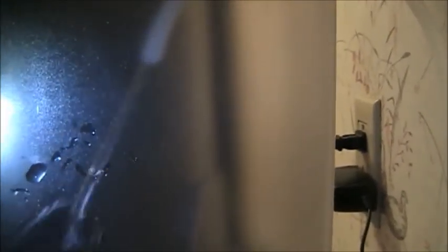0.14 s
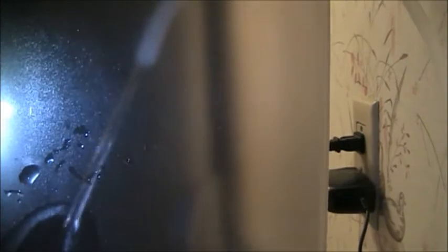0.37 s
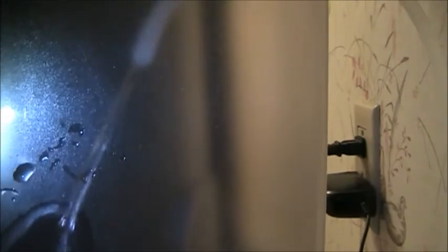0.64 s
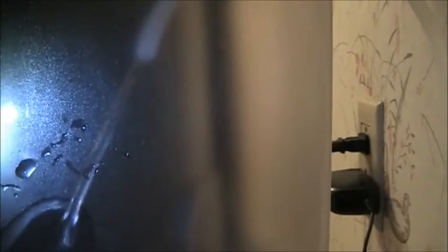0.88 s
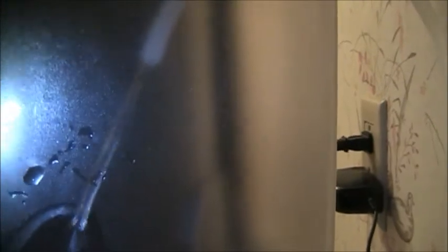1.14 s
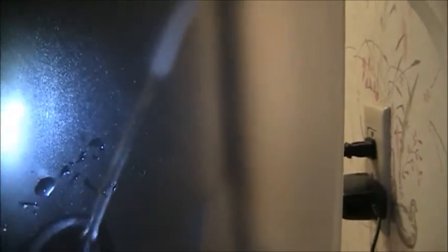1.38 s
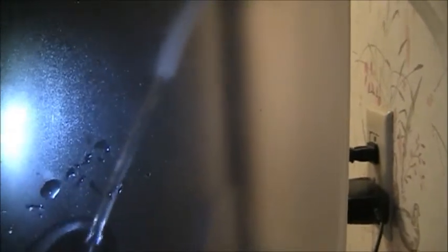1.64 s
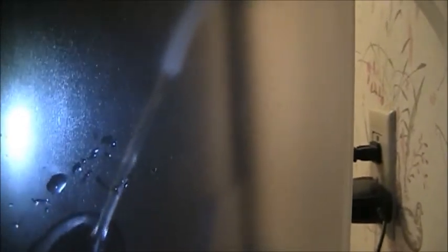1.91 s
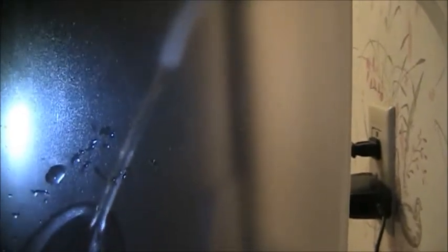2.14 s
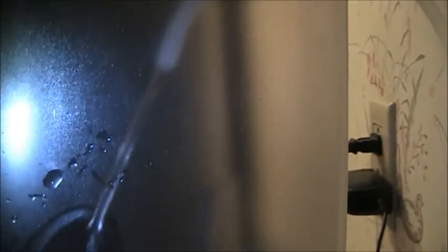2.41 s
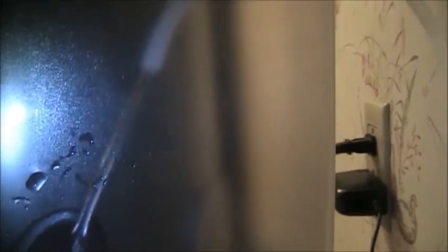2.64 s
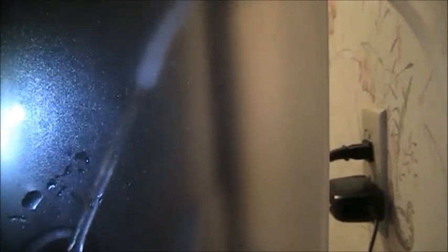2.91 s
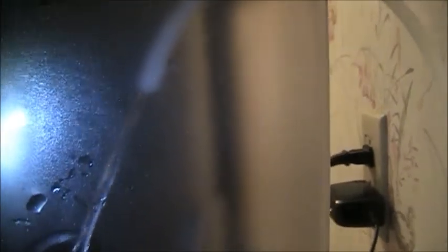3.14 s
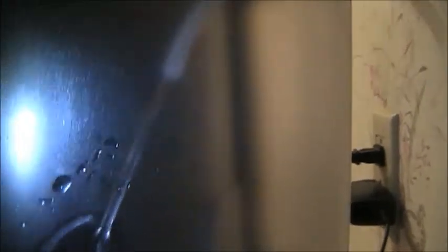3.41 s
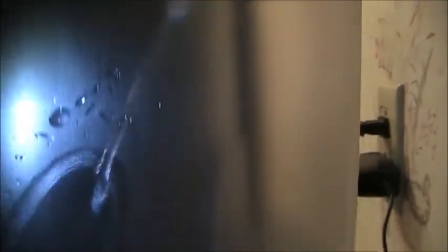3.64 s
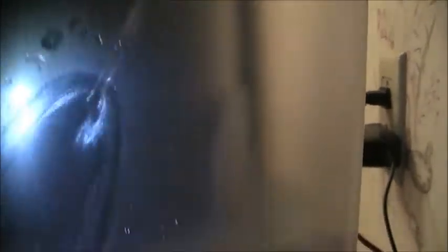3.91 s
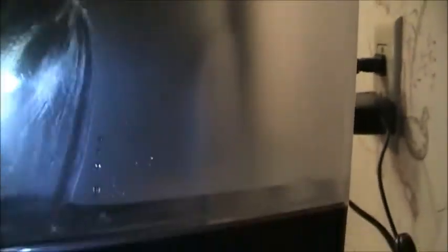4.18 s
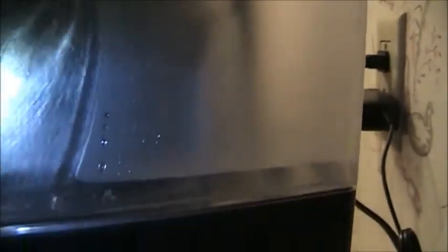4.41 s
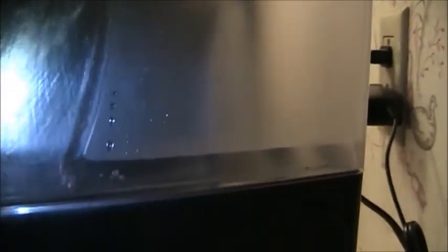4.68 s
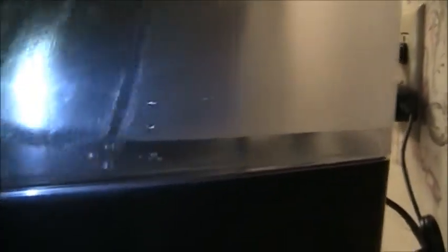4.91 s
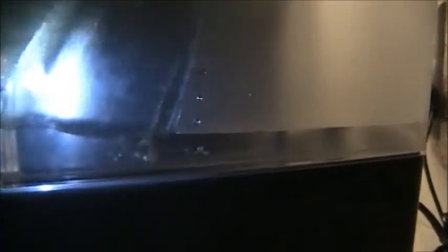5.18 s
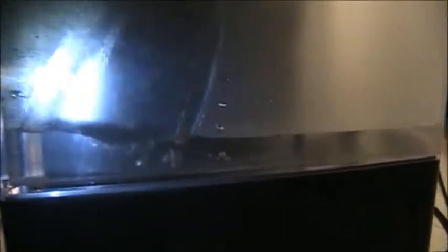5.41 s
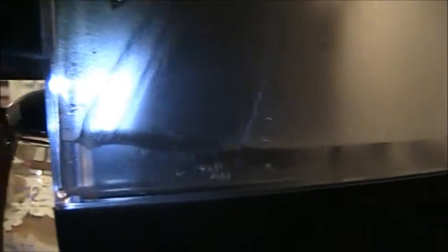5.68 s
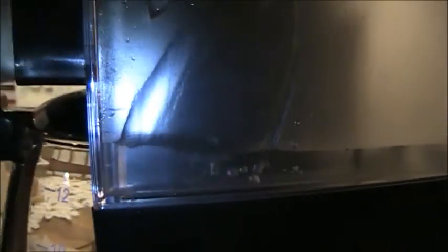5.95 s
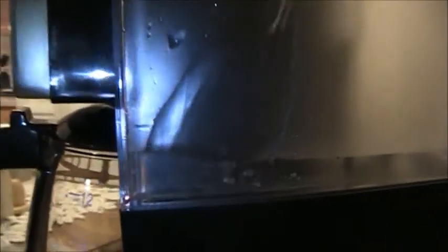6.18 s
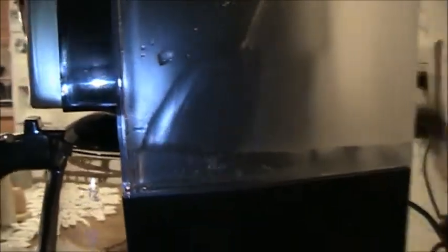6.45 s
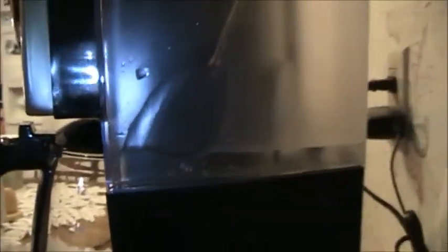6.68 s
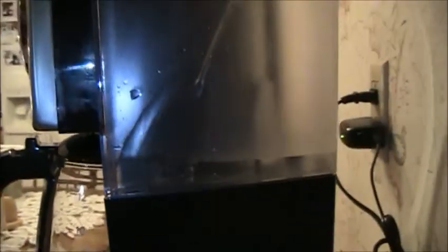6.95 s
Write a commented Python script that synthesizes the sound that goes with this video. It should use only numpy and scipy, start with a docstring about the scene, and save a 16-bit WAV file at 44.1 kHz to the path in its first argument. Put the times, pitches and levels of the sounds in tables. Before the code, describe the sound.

A sharp double clack of an electric valve opening, then a low mains hum, hollow water rush and bright bubble ticks in a plastic reservoir.

```python
"""A quiet kitchen: an electric valve clacks open and its coil hums at mains multiples, sums of decaying
and steady sines. Water rushes through the line, shaped noise that makes the plastic reservoir drone;
where the jet lands, small bubbles pop with bright ticks, short rings on splash clicks. A hand-held camera
with two close microphone ports rises above the reservoir, drifts down to its side, then lifts a little."""
import sys
import numpy as np
from scipy import signal
from scipy.fft import rfft, irfft, next_fast_len
from scipy.io import wavfile
from scipy.ndimage import uniform_filter1d

SR = 44100
rng = np.random.default_rng(int(sys.argv[2]) if len(sys.argv) > 2 else 0)


def makeup_ratio(level_db):
    """Linear amplitude ratio for a level in decibels (20 dB per factor of ten)."""
    decades = np.asarray(level_db, float) / 20
    return 10 ** decades


def to_wav(sig):
    """Store sig (one row per channel, or 1-D mono) as 16-bit WAV at the path in sys.argv[1].

    Samples outside -1..1 are clipped; the rate is SR.
    """
    pcm = np.clip(np.atleast_2d(sig), -1, 1) * 32767
    pcm = np.round(pcm).astype(np.int16)
    wavfile.write(sys.argv[1], SR, pcm.T)  # frames by channels


N = 311787

# Water flow and camera. Each row: time in seconds, rush level in dB, camera height (1 above, 0 beside).
FLOW = [(.12, -44, .7), (1.5, -42.5, .9), (2.3, -42, 1), (3.4, -41, .95), (4, -40, .45), (4.6, -40, .1),
        (5.7, -40, 0), (6.3, -41, 0), (7.07, -44, .3)]


def evened(x):
    """Scales to unit rms."""
    return x / np.sqrt(np.mean(x ** 2) + 1e-20)


def read(points, hz):
    """Reads a spectrum on a log-frequency axis."""
    f, value = np.transpose(points)
    return np.interp(np.log(hz + 1), np.log(f + 1), value)


def curve(rows, t):
    """Columns of a table at the times t."""
    s, *columns = np.transpose(rows)
    return [np.interp(t, s, c) for c in columns]


def add(mix, s, sound):
    """Lays a sound into the mix, channel by channel, at s seconds."""
    part = mix[:, round(s * SR):][:, :sound.shape[1]]
    part += sound[:, :part.shape[1]]


def hill(hz, centre_hz, width_hz):
    """Resonance shape: 1 at the centre, 1/2 half a width away."""
    return 1 / (1 + (2 * (hz - centre_hz) / width_hz) ** 2)


def noise(size, likeness, magnitude):
    """Two partly alike channels of random short-time spectra, shaped by magnitude(hz, t), at unit rms."""
    hop = size // 4
    frames = N // hop + 5
    hz = np.fft.rfftfreq(size, 1 / SR)[:, None]
    a, b, c, d = rng.standard_normal((frames, len(hz), 4)).T
    same = likeness(hz)
    left = a + 1j * b
    right = same * left + np.sqrt(1 - abs(same) ** 2) * (c + 1j * d)
    z = np.array([left, right]) * magnitude(hz, np.arange(frames) * hop / SR)
    return evened(signal.istft(z, nperseg=size, noverlap=size - hop)[1][:, :N])


def kitchen(level_db=-47.5):
    """Steady background of the room and the camera: shaped noise."""
    # Kitchen at rest. Each row: frequency in Hz, relative density in dB per Hz.
    room_spectrum = [(18, -34), (38, -28), (50, -9), (60, -7), (70, -16), (135, -19), (170, -12), (199, 0),
                     (245, -12), (330, -11), (900, -20), (2230, -27), (4190, -31), (12300, -41),
                     (16000, -45)]
    # Likeness of the two ports. Each row: frequency in Hz, left-right likeness (-1 to 1).
    room_same = [(40, -.3), (90, -.5), (150, .6), (400, .3), (800, -.3), (2000, -.6), (8000, -.2)]
    return makeup_ratio(level_db) * noise(4096, lambda hz: read(room_same, hz),
                                 lambda hz, t: makeup_ratio(read(room_spectrum, hz)))


def clack(crack_db=-11, room_db=-9, small_hz=190):
    """Each blow rings the valve's modes, a dull push mainly the low ones; the first also cracks. The room answers."""
    # Plunger meeting its stop. Each row: time in seconds, relative level in dB, share of dull push.
    blows = [(0.0866, -2, 0), (0.0881, -4.5, 0), (0.0933, -8.5, 0.7), (0.0951, 3, 1.16)]
    # Modes of valve body and housing. Each row: frequency in Hz, relative level in dB, t60 in seconds.
    modes = [(232, -21, 0.27), (312, -10, 0.063), (429, -18, 0.071), (553, -17.5, 0.064),
             (611, -11.5, 0.03), (813, -13.5, 0.03), (940, -31, 0.032), (1400, -2, 0.011),
             (1870, -2, 0.0071), (2520, -12, 0.0092), (3480, 0.5, 0.0097), (4550, -21, 0.0055),
             (5200, 3.5, 0.0061), (6150, 1, 0.0075), (7100, 0, 0.0054), (8400, 6, 0.003),
             (10400, -26, 0.0043)]
    # Decay of the kitchen. Each row: frequency in Hz, t60 in seconds.
    kitchen_t60 = [(200, 0.15), (700, 0.38), (2500, 0.36), (6000, 0.32), (10000, 0.24), (14000, 0.17)]
    t = np.arange(SR // 2) / SR
    dry = np.zeros((1, N))
    for s, db, dull in blows:
        ring = np.zeros(len(t))
        for k, (hz, mode_db, t60) in enumerate(modes):
            decay = makeup_ratio(mode_db - 60 * t / t60 - 20 * dull * np.log10(1 + hz / 700))
            build = 1 - np.exp(-hz * t / 0.7)  # about a cycle
            ring += decay * np.sin(2 * np.pi * hz * t + k ** 2) * build
        ring *= 1 - np.exp(-t / 0.00048)  # contact takes a moment
        add(dry, s, makeup_ratio(db) * ring[None])

    first_s = blows[0][0]
    # loose parts rattle
    crack = rng.standard_normal((3, len(t))) * makeup_ratio(crack_db) * np.exp(-(t / 0.0057) ** 2)

    hz, when, z = signal.stft(rng.standard_normal((2, len(t))), SR, nperseg=256)
    decay = makeup_ratio(-60 * when / read(kitchen_t60, hz)[:, None])
    tail = signal.istft(z * decay, SR, nperseg=256)[1][:, :len(t)]
    tail *= np.clip((t - .002) / 0.0017, 0, 1)  # first walls answer after a few milliseconds
    tail[1] = .8 * tail[0] + .6 * tail[1]

    # high modes beam past the room
    spread = signal.sosfilt(signal.butter(2, 500, fs=SR, output="sos"), dry)
    add(dry, first_s, signal.lfilter([1, 2, 1], [4], crack[:1]))
    snap = 2.1 * np.diff(np.exp(-t * 22000), prepend=0)
    shove = 14 * np.diff(np.exp(-t * 4000) - np.exp(-t * 14000), prepend=0)
    add(spread, first_s, snap[None])  # the snap itself is wide
    add(spread, first_s, shove[None])  # the housing shoves the air
    answer = signal.fftconvolve(spread, tail / np.linalg.norm(tail[0]), axes=1)[:, :N]
    wet = dry + makeup_ratio(room_db) * answer
    add(wet, first_s, .5 * crack[1:])  # each port catches its own part of the rattle
    # the camera shades the left port
    wet[0] = signal.lfilter([.2], [1, -.8], wet[0]) * .4 + np.roll(wet[0], 1) * .6
    # too small to radiate bass
    return signal.sosfilt(signal.butter(4, small_hz, "high", fs=SR, output="sos"), wet)


def hum(mains_hz=60.01, waver_db=1.1):
    """The coil pulls at multiples of the mains, each a sine whose level wavers on its own."""
    # Coil pull. Each row: multiple of the mains, level in dB rms ahead of the waver.
    multiples = [(4, -45.5), (6, -51.5), (9, -64.5), (10, -53), (11, -72), (14, -64.5), (30, -71),
                 (32, -69.5), (34, -74), (36, -75.5)]
    t = np.arange(N) / SR
    coarse_t = t[::64]
    out = np.zeros(N)
    for multiple, db in multiples:
        slow = sum(np.sin(2 * np.pi * (f * coarse_t + rng.random())) / np.sqrt(f)
                   for f in np.geomspace(.2, 6, num=12))
        level = makeup_ratio(db + waver_db * np.interp(t, coarse_t, evened(slow)))
        out += np.sqrt(2) * level * np.sin(2 * np.pi * (multiple * mains_hz * t + rng.random()))
    return out * np.clip((t - .087) / 0.013, 0, 1)


def air_power(hz, height):
    """Power gain of the reservoir's air resonances, which vary with camera height."""
    # Air space. Each row: frequency in Hz, hill width in Hz, dB heard from above, dB heard from the side.
    air = [(1190, 160, 0, 8), (1280, 90, 5, 0), (1360, 80, -3, 3), (1630, 90, 5, -2), (1685, 100, 0, 5),
           (1810, 220, 4, -6), (1930, 80, 0, 1), (2030, 90, 4, -2), (2145, 90, 1, 4), (2770, 170, 1, 8),
           (3200, 250, -6, 1), (3460, 130, 11.5, 2), (4300, 130, 1, 5), (4730, 120, 2, -4)]
    return 1 + sum((makeup_ratio(side + height * (top - side)) * hill(hz, f, w)) ** 2 for f, w, top, side in air)


def rush(patchy_db=1.5, side_bright_db=2.5, side_hollow_db=-3.5):
    """Turbulence, as shaped noise, shakes the reservoir's walls and its air space."""
    # Turbulence in the line. Each row: frequency in Hz, relative density in dB per Hz.
    line_spectrum = [(18, -71), (130, -13), (172, -21), (220, -0.5), (287, -7.5), (400, -4), (499, -12.5),
                     (850, -17), (1000, -15), (1500, -12.5), (2400, -18), (3100, -21.5), (6900, -30.5),
                     (15000, -38.5), (16400, -46)]
    # Wall resonances under the flow. Each row: frequency in Hz, width in Hz, dB over the rush.
    wall_modes = [(197, 13, 15), (219, 14, 7), (230.5, 7, 17), (376, 14.5, 16), (350, 88, 7.5),
                  (473, 35, 11.5), (580, 44, 9), (698, 30, 9.5), (772, 40, 16), (825, 45, 13.5),
                  (868, 44, 12)]
    # Likeness of the two ports. Each row: frequency in Hz, left-right likeness ahead of a 0.99 ceiling.
    port_same = [(150, 0.63), (400, 1), (900, 0.87), (2400, 0.67), (6000, 0.72), (15000, 0.18)]
    # Unlike paths from walls to ports. Each row: frequency in Hz, swing of the phase ripple in radians.
    ripple = [(300, 0), (450, 1.17), (1000, 0.95), (2200, 1.5), (5000, 1.5), (12000, -42)]

    def likeness(hz):
        phase = read(ripple, hz) * np.sin(hz / 70 + np.sin(hz / 310))
        return np.clip(read(port_same, hz), 0, .99) * np.exp(1j * phase)

    def magnitude(hz, t):
        height = curve(FLOW, t)[1]
        walls = sum(makeup_ratio(db) ** 2 * hill(hz, f, w) for f, w, db in wall_modes)
        # the side passes more treble and less of the wall drone near 800 Hz
        side_db = side_bright_db * (1 - height) * np.clip(hz / 500 - 1, 0, 1)
        side_db = side_db + side_hollow_db * (1 - height) * hill(hz, 800, 260)
        patches = rng.standard_normal((len(t), len(hz))).T
        patches = uniform_filter1d(patches, size=20, axis=0)
        patches = evened(uniform_filter1d(patches, size=3, axis=1))
        source = makeup_ratio(read(line_spectrum, hz) + side_db + patchy_db * patches)
        return source * np.sqrt(walls + air_power(hz, height))

    t = np.arange(N) / SR
    opening = np.clip((t - .09) / 0.018, 0, 1)  # the line fills once the valve is open
    return makeup_ratio(curve(FLOW, t)[0]) * opening * noise(4096, likeness, magnitude)


def bubble(hz, cycles, splash_db, chance, near_db=3.0, near_t60=0.015, far_db=-4, far_t60=0.066,
           echo_s=.0034, echo_db=-12):
    """A short ring on a splash click as brief as its cycle, scattered by the near wall, then the whole reservoir."""
    turns = hz * np.arange(400) / SR
    # cycles: decay to 1/e, at least half a cycle
    ring = np.sin(2 * np.pi * turns) * np.exp(-turns / max(cycles, .5)) * (1 - np.exp(-turns / 0.8))
    splash = np.diff(np.exp(-turns * 1.4) - np.exp(-turns * 5), prepend=0)
    source = ring / abs(ring).max() + makeup_ratio(splash_db) * splash / abs(splash).max()

    later = np.arange(chance.shape[1]) / SR
    near = makeup_ratio(-60 * later / near_t60)
    far = makeup_ratio(-60 * later / far_t60)
    walls = chance * (makeup_ratio(near_db) * near / np.linalg.norm(near) + makeup_ratio(far_db) * far / np.linalg.norm(far))
    walls[1] = 0.42 * walls[0] + 0.9 * walls[1]  # each port hears its own scatter
    walls[:, 0] += 1  # direct sound
    walls[:, round(echo_s * SR)] += makeup_ratio(echo_db + near_db)  # the opposite wall throws it back once
    sound = signal.fftconvolve(source[None], walls, axes=1)
    return sound / abs(sound).max()


def fizz(count=30, per_s=900, spread_db=4.5, clump_db=2.5, splash_db=6.5):
    """Many faint bubbles of all sizes in loose clumps, a few of them larger."""
    # Louder as the camera nears the surface. Each row: time in seconds, level in dB ahead of the air space.
    fizz_level = [(0.25, -66.5), (1.2, -58), (2.0, -55), (3.3, -57.5), (4.2, -54.5), (5.8, -52.5),
                  (7.07, -51)]
    strength = makeup_ratio(spread_db * np.minimum(rng.exponential(1, N), 2.8))
    strength *= rng.random(N) < per_s / SR
    # clumps last some 60 ms
    strength *= makeup_ratio(clump_db * evened(uniform_filter1d(rng.standard_normal(N), size=2500)))
    kind = rng.integers(0, count, N)
    out = np.zeros((2, N))
    for k, hz in enumerate(np.linspace(4600, 15500, count)):
        grain = bubble(hz, rng.uniform(0.4, 1.24), splash_db, rng.standard_normal((2, 2000)))
        out += signal.oaconvolve((strength * (kind == k))[None], grain, axes=1)[:, :N]
    t = np.arange(N) / SR
    return makeup_ratio(curve(fizz_level, t)[0]) * evened(out) * (t > .2)


def pops(splash_db=3.5, splash_db_per_cycle=-.8, slap_cycles=0.5, slap_splash_db=-2):
    """Bubbles and slaps that stand out one by one; a slap barely rings."""
    # Clearest bubbles. Each row: time in seconds, peak in dB ahead of the air space, pitch in Hz,
    # cycles it rings (decay to 1/e).
    clear_bubbles = [(0.356, -28.5, 6300, 1.1), (0.388, -43, 6900, 5.2), (0.4465, -39, 9600, 1.1),
                     (0.495, -33, 11000, 0.83), (0.511, -28, 6340.0, 3.5), (0.53, -26.5, 7160, 0.99),
                     (0.569, -33, 13000, 1.3), (0.708, -46, 9000, 1), (1.2135, -30, 6450, 4.6),
                     (1.265, -39, 9340.0, 3.3), (1.279, -25, 6660, 1.4), (1.3544, -37, 9050, 1),
                     (1.371, -42, 3540, 5.1), (1.4394, -44, 9200, 6.1), (1.4625, -41, 9000, 4),
                     (1.5979, -39, 5510.0, 2.5), (1.6728, -34, 8850, 5.1), (1.6934, -41, 9460.0, 4.9),
                     (1.7287, -24.5, 8400, 1.3), (1.7895, -38, 6000, 1.9), (1.8655, -51, 4800.0, 6.3),
                     (1.8657, -45, 9500, 1.2), (1.874, -46, 9000, 1.2), (1.8793, -36, 4350.0, 4.1),
                     (1.893, -42, 7500, 1.1), (1.908, -35, 6600, 1.4), (1.9083, -29, 10520.0, 1.2),
                     (1.9258, -38, 11460.0, 7.0), (1.9502, -33, 10990.0, 1.7), (1.9589, -32.5, 9000, 1.9),
                     (2.0076, -32.5, 6150, 3.9), (2.043, -24, 9600, 1.8), (2.1584, -46.0, 7000.0, 8.9),
                     (2.1669, -38, 11100, 6.8), (2.2244, -34, 9000, 5.1), (2.3588, -32, 12100, 3.3),
                     (2.4694, -39, 12500, 4), (2.4962, -40, 10270.0, 7.5), (2.5614, -31.5, 6770.0, 3.6),
                     (2.5897, -31, 8800, 1.2), (2.599, -37, 8190.0, 1.8), (2.621, -39, 6940, 1.3),
                     (2.7643, -29, 6830, 6.7), (2.8136, -41, 8300, 3.5), (2.8884, -43, 10660.0, 9.0),
                     (2.9574, -32, 11500, 2), (2.9618, -28, 7100, 2.1), (2.9726, -27.5, 8900, 3),
                     (3.0115, -42, 9100, 9.0), (3.1467, -35, 7040, 1.1), (3.1938, -42, 7210.0, 3.7),
                     (3.2284, -28.5, 9000, 5.5), (3.234, -25.5, 6500.0, 3.4), (3.246, -44, 6630.0, 1.7),
                     (3.3487, -31.5, 10700, 3.6), (3.4371, -41, 6800, 5.6), (3.4895, -33.5, 6910.0, 1.5),
                     (3.493, -29, 11500, 7.7), (3.5763, -28.0, 6640, 4.4), (3.6037, -38, 12500, 4),
                     (3.6486, -41, 6320.0, 5.1), (3.6886, -31, 10000, 2.5), (3.736, -32.5, 6850, 2.6),
                     (3.845, -23.5, 8700, 1.3), (3.853, -33.5, 7110.0, 2), (3.8982, -41, 10050.0, 9.0),
                     (3.9736, -25, 10600, 4.4), (3.9912, -34, 7500, 4), (4.005, -23.5, 7060, 3.5),
                     (4.008, -35, 10700, 4.6), (4.0669, -39, 4890.0, 2.2), (4.085, -23.5, 7000, 0.63),
                     (4.1203, -46, 9000.0, 8.3), (4.1679, -40, 7100, 5.3), (4.21, -36, 12500, 4),
                     (4.22, -37.5, 7400, 5.6), (4.3384, -42, 8570.0, 5.2), (4.348, -41, 7480.0, 3.3),
                     (4.3743, -41, 9930.0, 7.3), (4.394, -30.5, 5460, 1.3), (4.423, -31.5, 7300, 2.5),
                     (4.457, -35, 11500.0, 8.3), (4.53, -41, 6500, 8.2), (4.5849, -27.5, 5360, 2.7),
                     (4.6247, -29, 7900.0, 1.2), (4.7859, -30, 11100, 5), (4.846, -35, 8240, 4.9),
                     (4.866, -35.5, 5790.0, 6), (4.9648, -25.5, 6150, 3.9), (5.0678, -36, 12500, 3),
                     (5.1374, -29.5, 5940, 0.72), (5.1777, -26, 7550.0, 1.2), (5.217, -30, 10500, 1.3),
                     (5.2541, -32, 8500, 4.4), (5.257, -30, 13140.0, 4.4), (5.3225, -29, 5900, 1.9),
                     (5.3224, -32, 12500, 4), (5.3682, -31, 13360.0, 3.4), (5.3695, -37.0, 8550.0, 2.8),
                     (5.3868, -26, 11300, 3.4), (5.3982, -31, 7710.0, 1.3), (5.411, -39, 7800, 7.6),
                     (5.487, -25, 6100, 2.2), (5.5174, -33, 7140.0, 4.5), (5.5646, -34, 5400, 1.6),
                     (5.5727, -37, 12500, 4), (5.5803, -37, 5250.0, 0.9), (5.5984, -42, 9830.0, 5.0),
                     (5.6146, -38, 3700.0, 2.8), (5.6146, -29, 8000, 4.9), (5.65, -33, 10470.0, 3.7),
                     (5.7338, -38, 7500, 6), (5.7706, -21.5, 12500, 1.8), (5.7705, -30, 6050, 0.91),
                     (5.7819, -33, 13800, 6.2), (5.7875, -33, 9000, 0.83), (5.7937, -45, 7150.0, 4.3),
                     (5.8, -33, 11290.0, 8.3), (5.8175, -28, 7100, 6), (5.833, -35, 8750.0, 3.5),
                     (5.8352, -28, 14500, 3), (5.8488, -25, 4260, 0.97), (5.8535, -39, 4270, 8),
                     (5.8545, -33, 11000, 1.5), (5.879, -42, 8890.0, 2.1), (5.8932, -38, 10960.0, 4.0),
                     (5.916, -30, 9100, 2.6), (5.926, -37, 12500, 4), (6.016, -29.5, 6560, 1.2),
                     (6.036, -35, 11200.0, 3.4), (6.0438, -33, 13600.0, 3.5), (6.057, -26, 6500.0, 2),
                     (6.0715, -38.0, 7040, 2.6), (6.0855, -39.0, 6910.0, 3.6), (6.1053, -33, 4300, 4.9),
                     (6.1144, -35, 12000, 1.3), (6.1409, -45, 8600.0, 9.0), (6.16, -31, 8430.0, 4.1),
                     (6.1685, -30, 6800, 2.4), (6.1828, -41.0, 9550.0, 3.8), (6.197, -24.5, 6920.0, 2.8),
                     (6.1977, -30, 12000, 4), (6.206, -24.5, 12290.0, 3.6), (6.2205, -28.5, 5130, 6.5),
                     (6.243, -27, 13800, 3), (6.246, -30, 5820.0, 1.0), (6.25, -27.5, 10820.0, 4.4),
                     (6.266, -35, 6810.0, 3.5), (6.278, -37, 5190.0, 2.7), (6.294, -37, 8530.0, 1.7),
                     (6.298, -33, 5800, 2.2), (6.2999, -30, 14500, 5), (6.311, -29, 5230, 4.9),
                     (6.3252, -26.5, 8930.0, 3.6), (6.4298, -26, 10900, 2.3), (6.465, -39, 12000, 1.1),
                     (6.481, -38, 9120.0, 2.8), (6.495, -22, 10600, 2.5), (6.5073, -37, 7290.0, 1.0),
                     (6.5083, -36.0, 10220.0, 2.8), (6.59, -39, 10470.0, 5.4), (6.6018, -34, 10780.0, 2.1),
                     (6.6198, -33, 13040.0, 3.9), (6.6238, -43, 8090.0, 5.9), (6.667, -26, 6200, 2.1),
                     (6.6809, -44, 6780.0, 3.1), (6.688, -36, 7730.0, 1.9), (6.725, -29.5, 8400, 3.4),
                     (6.7298, -26, 4900, 6.7), (6.739, -45.0, 9500.0, 6.9), (6.7525, -39, 4260, 9.1),
                     (6.759, -32, 9080.0, 2.6), (6.7666, -35, 11000, 8), (6.7943, -33, 6400, 8.2),
                     (6.817, -39, 10100.0, 6.1), (6.8168, -33.0, 5570, 4.8), (6.8221, -38.0, 12700.0, 7.7),
                     (6.829, -32, 11520.0, 3.7), (6.8427, -27, 10900, 2.6), (6.8603, -30, 9350, 3.8),
                     (6.8792, -30, 14000, 2.8), (6.8905, -31, 10840.0, 3.2), (6.902, -35, 5640, 1.5),
                     (6.9172, -29, 6600, 0.88), (6.9437, -36, 9200.0, 3.4), (6.9675, -32, 10710.0, 1.3),
                     (6.9812, -41, 8440.0, 5), (7.0371, -38, 12600, 9.0), (7.0565, -39, 6140, 1.2),
                     (7.066, -41, 9000, 3)]
    # Heavy drops that slap the surface. Each row: time in seconds, peak in dB ahead of the air space, pitch in Hz.
    slaps = [(4.087, -38, 1600), (5.7698, -40, 1500), (5.8488, -26.5, 1470), (6.105, -30.5, 1300),
             (6.1987, -31.5, 2600), (6.223, -31, 2740), (6.244, -37, 2750), (6.311, -31.5, 2740),
             (6.3245, -30, 2760), (6.7312, -29, 1360)]
    # the longer a bubble rings, the fainter its splash
    rows = [(*pop, splash_db + splash_db_per_cycle * pop[-1]) for pop in clear_bubbles]
    rows += [(*slap, slap_cycles, slap_splash_db) for slap in slaps]
    out = np.zeros((2, N))
    for s, db, hz, cycles, click_db in rows:
        add(out, s, makeup_ratio(db) * bubble(hz, cycles, click_db, rng.standard_normal((2, 2000))))
    return out


def through_air(x, air_share=.6):
    """Pops sit near the opening and take only part, in dB, of the reservoir's air resonances."""
    hz, t, z = signal.stft(x, SR, nperseg=1024)
    gain = air_power(hz[:, None], curve(FLOW, t)[1]) ** (air_share / 2)
    return signal.istft(z * gain, SR, nperseg=1024)[1][:, :N]


def scene():
    """Valve, water and room."""
    return kitchen() + clack() + hum() + rush() + through_air(fizz() + pops())


def roll_off(x):
    """The treble ends steeply here."""
    return signal.sosfilt(signal.butter(12, 16460, fs=SR, output="sos"), x)


def record(dry, overload=.85):
    """The input stage rounds off peaks near the overload amplitude; the ports differ in level and phase."""
    # Level between ports. Each row: frequency in Hz, left over right in dB.
    tilt = [(60, 0.0), (150, -2.0), (380, -3.0), (950, -1.5), (2380, -2.0), (5980, -1.0), (15000, -1.0)]
    # Phase between ports. Each row: frequency in Hz, lead of the left in radians.
    lead = [(120, 0), (170, .3), (420, 0), (820, -.3), (1200, -.1), (4000, .1), (12000, .3)]
    # Treble limit of the microphones. Each row: frequency in Hz, gain in dB.
    mic_top = [(9000, 0), (12000, -3), (14500, -2.5), (15700, -9), (16400, -70)]
    size = next_fast_len(N)
    hz = np.fft.rfftfreq(size, 1 / SR)
    half = makeup_ratio(read(tilt, hz) / 2) * np.exp(.5j * read(lead, hz))  # half the difference to each port
    rounded = dry / (1 + (dry / overload) ** 4) ** 0.28
    spectrum = rfft(rounded, size) * makeup_ratio(read(mic_top, hz)) * np.array([half, 1 / half])
    ports = irfft(spectrum, size)[:, :N]
    return roll_off(ports)


dry = scene()
out = record(dry)
to_wav(out)
```